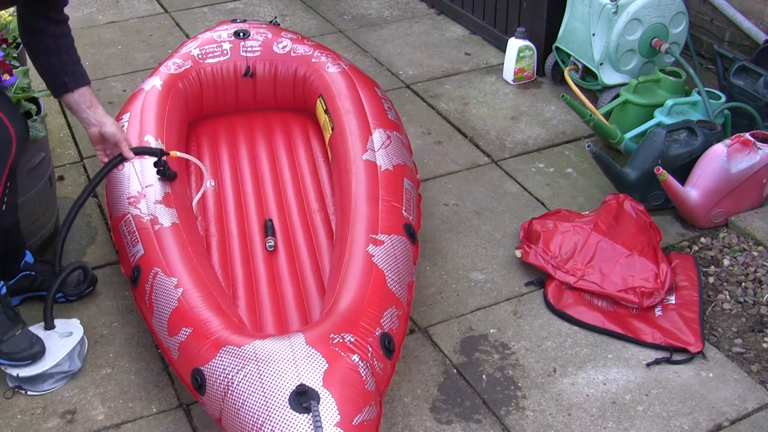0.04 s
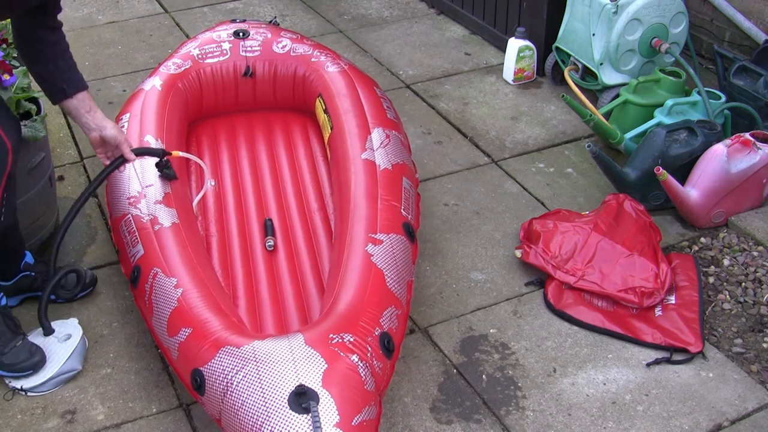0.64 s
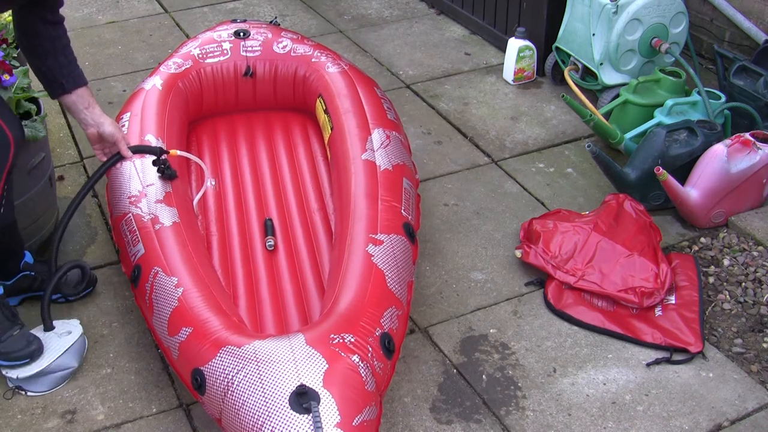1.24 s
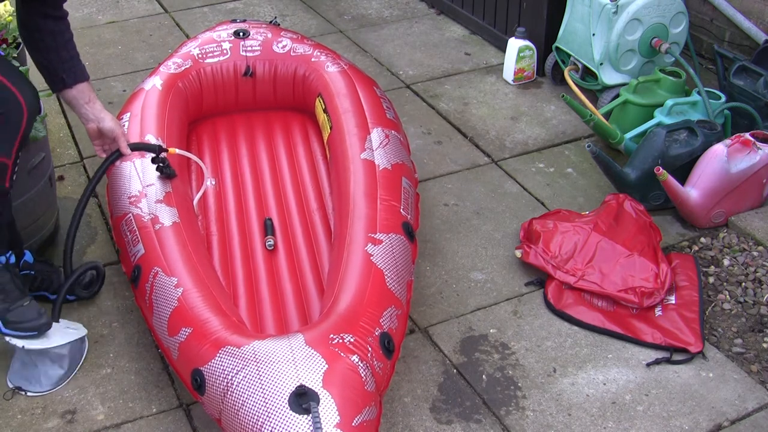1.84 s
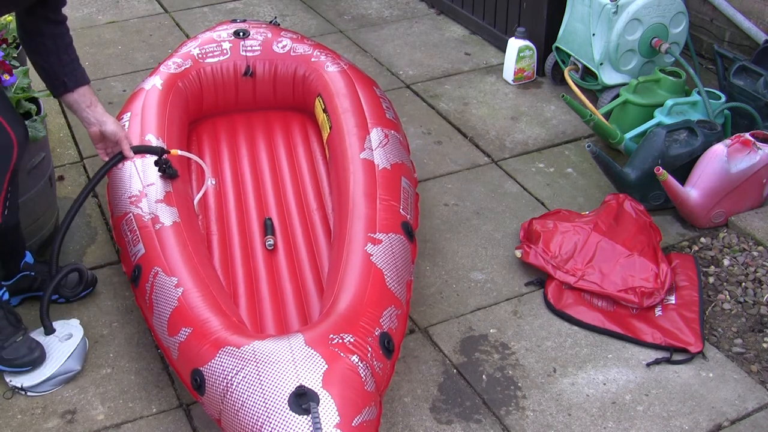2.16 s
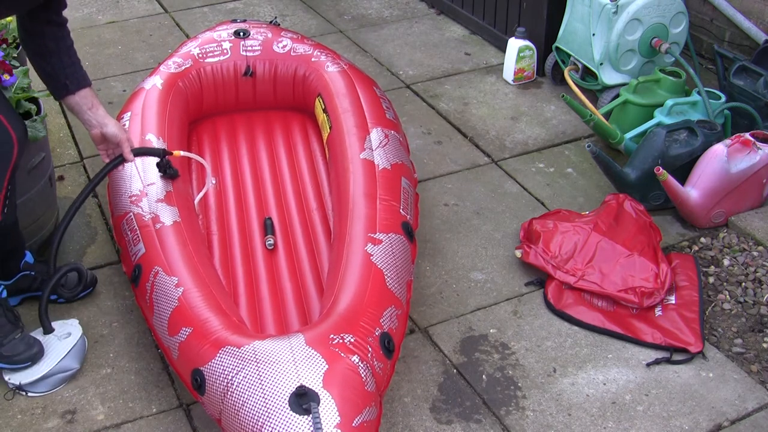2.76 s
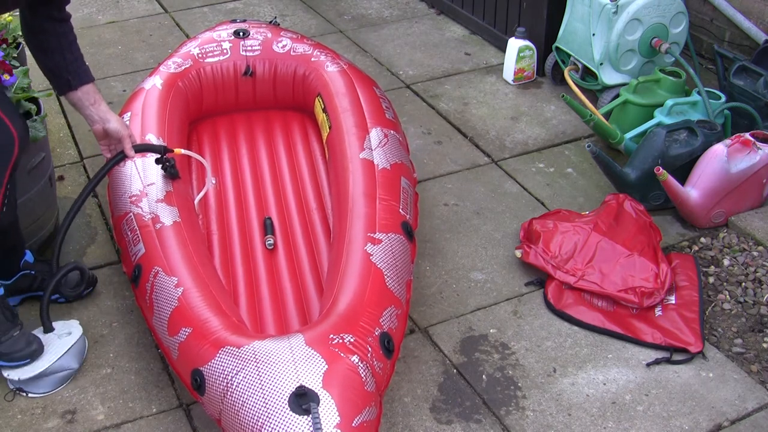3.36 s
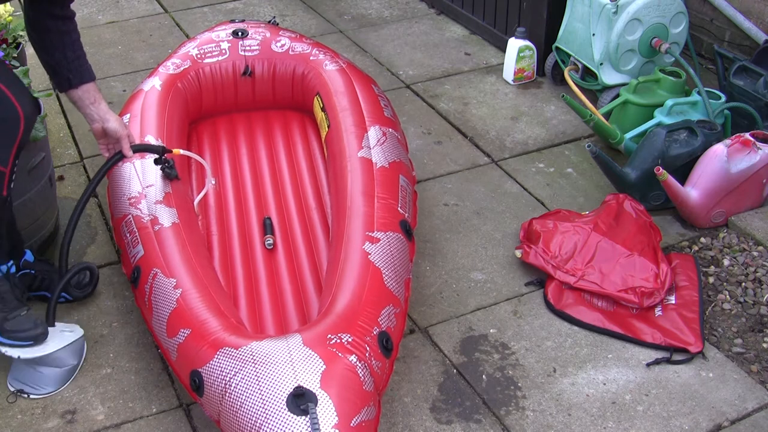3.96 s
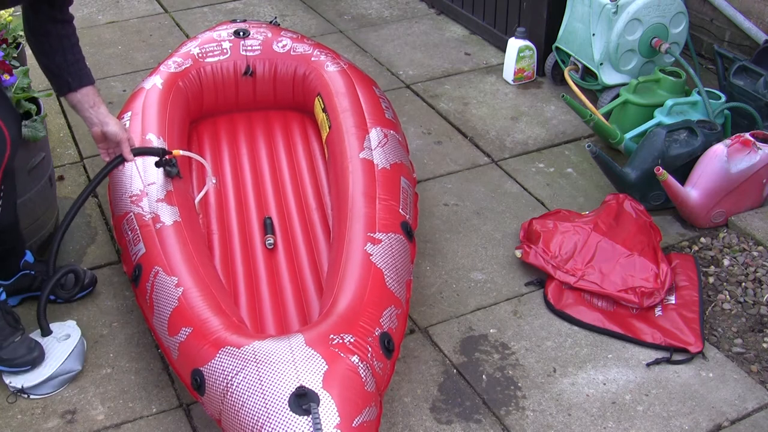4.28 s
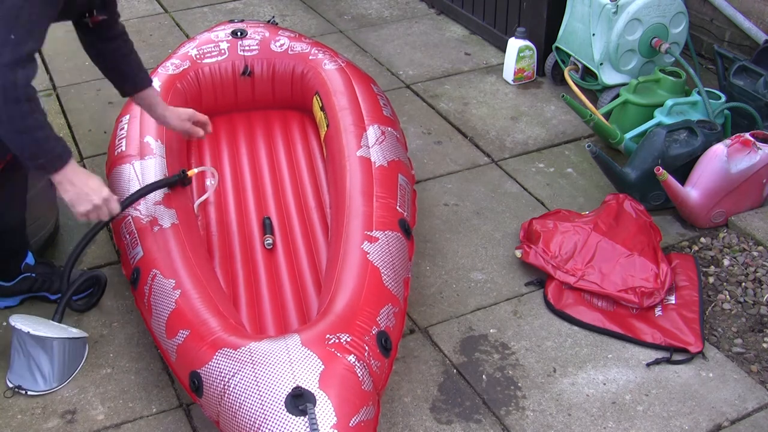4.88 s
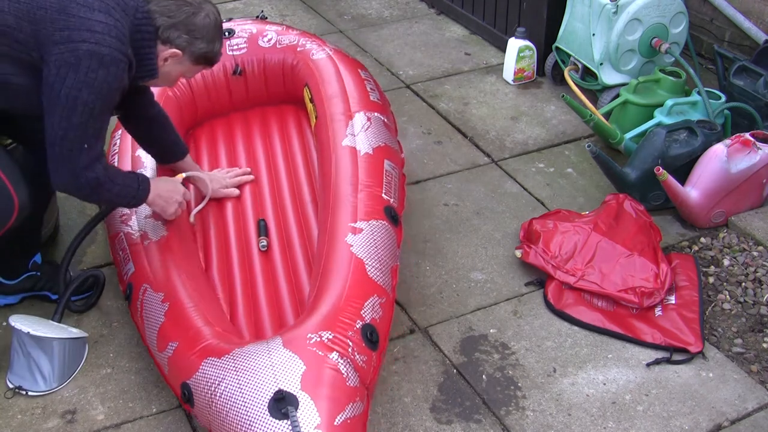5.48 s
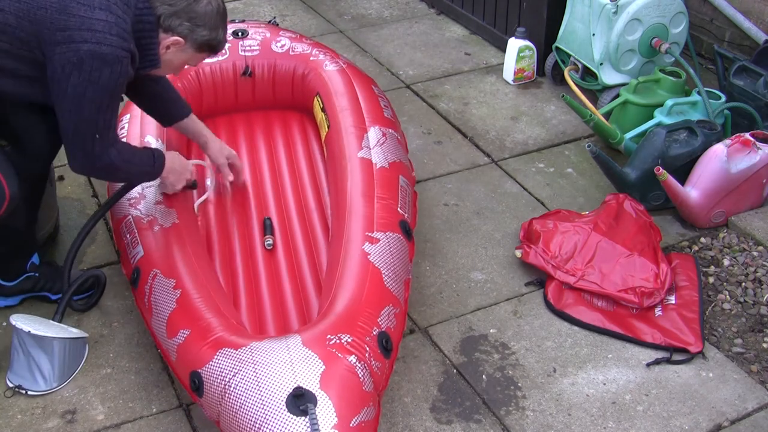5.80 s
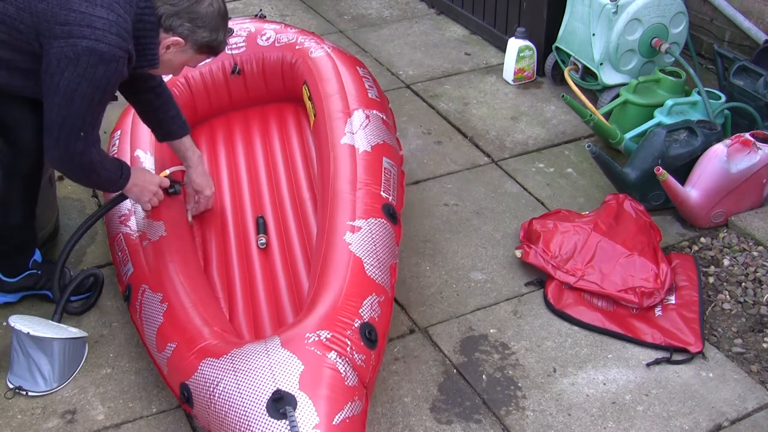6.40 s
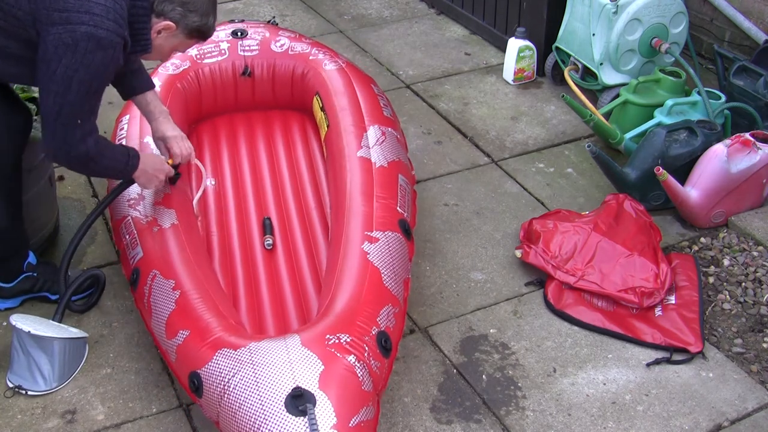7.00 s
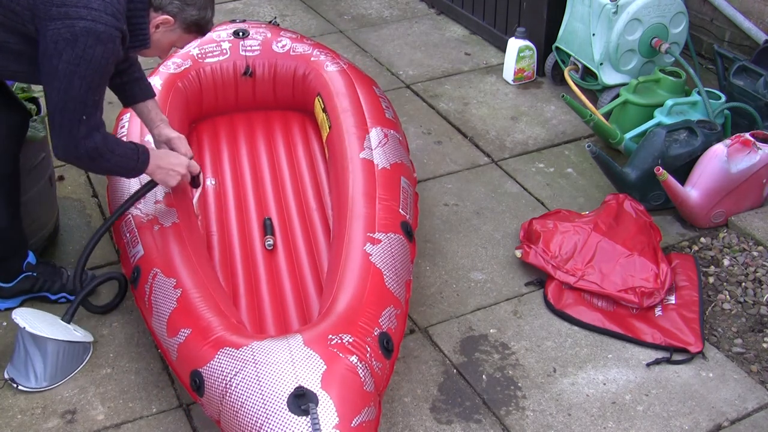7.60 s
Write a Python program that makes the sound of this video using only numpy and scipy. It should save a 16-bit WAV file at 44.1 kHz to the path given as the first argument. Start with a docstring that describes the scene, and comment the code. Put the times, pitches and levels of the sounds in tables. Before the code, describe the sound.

Steady foot pump strokes fill an inflatable boat outdoors as birds chirp, followed by nozzle clicks, a hollow bump and a sudden hiss.

```python
"""A paved patio, where a bellows foot pump fills an inflatable kayak. The fabric crumples as it refills,
the intake flap claps shut, and each tread drives a whoosh of turbulent air down the hose. Then hands
work the clicking plastic nozzle loose and bump the hull, and a jet of air hisses from the valve.
A tit sings its two notes and another bird whistles farther off, over the rumble of a distant town."""
import sys
import numpy as np
from scipy import signal
from scipy.fft import rfft, irfft
from scipy.io import wavfile
from scipy.ndimage import uniform_filter1d

SR = 44100
rng = np.random.default_rng(int(sys.argv[2]) if len(sys.argv) > 2 else 0)


def wav_record(signal):
    """Record a signal, one row per channel, as 16-bit PCM in the file named by sys.argv[1]."""
    frames = np.transpose(np.atleast_2d(signal))
    bounded = np.clip(frames, -1, 1)
    # unit amplitude maps onto the largest positive 16-bit level
    quanta = np.round(bounded * 32767).astype(np.int16)
    wavfile.write(sys.argv[1], SR, quanta)


N = 336924
T = np.arange(N) / SR


def amp(db):
    return 10 ** (np.asarray(db) / 20)


def unit(x):
    return x / np.sqrt(np.mean(x ** 2) + 1e-20)


def read(points, hz):
    """Joins points by straight lines on a log-frequency axis."""
    f, value = np.transpose(points)
    return np.interp(np.log(hz + 1), np.log(f + 1), value)


def add(mix, s, sound):
    """Lays a sound into the mix at time s."""
    start = round(s * SR)
    sound = sound[max(-start, 0):]
    part = mix[max(start, 0):][:len(sound)]
    part += sound[:len(part)]


def drift(hz, size=4096):
    """Random wander of rms 1, moving up to hz times a second."""
    return unit(np.interp(2 * hz * T, np.arange(size), rng.standard_normal(size)))


def swell(s, rise_s, fall_s, roundness=1):
    """Gain that grows to 1 at time s and dies away; roundness 1 is a sharp crest, 2 a bell."""
    gain = np.zeros(N)
    near = slice(*np.searchsorted(T, [s - 10 * rise_s, s + 10 * fall_s]))
    distance = np.maximum((s - T[near]) / rise_s, (T[near] - s) / fall_s)
    gain[near] = np.exp(-abs(distance) ** roundness)
    return gain


def gate(from_s, to_s, in_s, out_s):
    """Gain of 1 between two times, with a ramp around each."""
    return np.clip(np.minimum((T - from_s) / in_s, (to_s - T) / out_s) + .5, 0, 1)


def body(colour, rings=(), size=4096):
    """Minimum-phase response: a broad colour (Hz, dB) with resonances (Hz, width Hz, height dB)."""
    hz = np.fft.rfftfreq(size, 1 / SR)
    peaks = sum((amp(db) - 1) / (1 + (2 * (hz - f) / width) ** 2) for f, width, db in rings)
    gain = amp(read(colour, hz)) * (1 + peaks)
    cepstrum = irfft(np.log(np.maximum(gain, 1e-5)))
    cepstrum[1:size // 2] *= 2
    cepstrum[size // 2 + 1:] = 0
    return irfft(np.exp(rfft(cepstrum)))


def through(x, response):
    return signal.oaconvolve(x, response)[:len(x)]


def shelf(x, hz, treble_db):
    """Raises or lowers everything above hz."""
    low = signal.sosfilt(signal.butter(1, hz, fs=SR, output="sos"), x)
    return low + amp(treble_db) * (x - low)


def grains(per_s, spread_db, smooth):
    """Tiny slips of uneven size over a share of smooth noise."""
    slips = (rng.random(N) < per_s / SR) * rng.choice([-1, 1], N)
    sizes = amp(spread_db * np.minimum(rng.exponential(1, N), 3))
    return unit(unit(slips * sizes) + smooth * rng.standard_normal(N))


def strike(response, rattle, rattle_s, size=8000):
    """One sharp push and its dying chatter, through a body."""
    t = np.arange(size) / SR
    chatter = rng.standard_normal(size) * np.exp(-t / rattle_s)
    return through((t == 0) + rattle * chatter / np.linalg.norm(chatter), response)


def peaked(x, db):
    """Scales a hit so that its loudest 4 ms have this level."""
    return amp(db) * x / np.sqrt(uniform_filter1d(x ** 2, size=176).max())


def blurred(hz, width_hz, size=4096):
    """A band of noise that follows a pitch curve."""
    noise = rng.standard_normal((2, len(hz) + size))
    lowpass = signal.butter(3, width_hz / 2, fs=SR, output="sos")
    real, imag = signal.sosfilt(lowpass, noise)[:, size:]
    carrier = np.exp(2j * np.pi * np.cumsum(hz) / SR)
    return unit(((real + 1j * imag) * carrier).real)


def swishes(rows):
    """Short swells of noise in one band each."""
    out = np.zeros(N)
    for s, length_s, hz, width_hz, db in rows:
        count = int(length_s * SR)
        add(out, s, amp(db) * blurred(np.full(count, hz), width_hz) * signal.windows.tukey(count, .7))
    return out


def off_walls(x, depth, delay_s, count=5):
    """A few reflections comb the spectrum."""
    delays = (SR * delay_s * rng.uniform(.1, 1, count)).astype(int)
    reflections = sum(np.pad(x, (delay, 0))[:N] for delay in delays)
    return (x + depth * reflections) / np.sqrt(1 + count * depth ** 2)


def past_fingers(x, depth, delay_s, count=4):
    """Short reflections come and go as the fingers move, rippling the colour."""
    delays = (SR * delay_s * rng.uniform(.15, 1, count)).astype(int)
    return unit(x + depth * sum(np.roll(x, delay) * drift(7.8) for delay in delays))


def echoes(x, t60s, delay_s, size=32768):
    """Sparse reflections from paving, fence and walls; each band dies at its own rate (Hz, T60 s)."""
    taps = rng.choice([-1., 1.], size) * (rng.random(size) < 2000 / SR)
    taps *= np.arange(size) > delay_s * SR
    hz, t, spectra = signal.stft(taps, SR, nperseg=256)
    decay = amp(-60 * t / read(t60s, hz)[:, None])
    _, tail = signal.istft(spectra * decay, SR, nperseg=256)
    return through(x, tail / np.linalg.norm(tail))


# Town spectrum. Each row: frequency in Hz, gain in dB.
TOWN_COLOUR = [(15, -60), (25, -14.5), (130, 6), (180, -7), (277, -3.5), (476, -11), (754, -14),
               (1260, -19.5), (1790, -27), (2610, -22), (3430, -17.5), (3820, -22.5), (6920, -29),
               (14800, -39.5), (16000, -57)]


def town(rumble_db=-49, waver_db=1.5, drone_db=-54, drone_hz=128):
    """A soft distant rumble with a wavering low drone."""
    rumble = unit(through(rng.standard_normal(N), body(TOWN_COLOUR)))
    rumble *= amp(rumble_db + waver_db * drift(2))
    drone = drift(8.7) * np.sqrt(2) * np.sin(2 * np.pi * drone_hz * T)
    return rumble + amp(drone_db) * drone


# Note contours. Each row: time into the note in seconds, pitch in Hz, relative level in dB.
LOW_NOTE = [(0, 3680, -21), (.012, 3660, 1), (.035, 3610, -1.5), (.056, 3540, -1.5), (.085, 3540, -7),
            (.1, 3500, -18)]
HIGH_NOTE = [(0, 4330, -34), (.01, 4280, -2.5), (.02, 4225, 2.5), (.042, 4230, -8.5), (.064, 4190, 1),
             (.084, 4100, -6.5)]
# Calls on each note. Each row: start in seconds, level in dB.
LOW_CALLS = [(-.025, -39), (0.347, -36), (.803, -37), (2.433, -35.5), (2.831, -40), (3.222, -36),
             (3.633, -37), (5.04, -37), (5.439, -37), (5.852, -34)]
HIGH_CALLS = [(.088, -37), (.498, -35.5), (0.923, -35), (2.149, -37.5), (2.556, -35.5), (2.962, -34),
              (3.367, -32), (3.79, -32), (5.179, -33.5), (5.588, -35), (5.998, -32.5)]


def tit(waver_db=2.5, octave_db=-31, chip_db=-11, chip_s=.02, chip_hz=4600, chip_width_hz=600):
    """Two thin falling notes in turn; the higher one starts with a hoarse chip."""
    out = swishes([(s, chip_s, chip_hz, chip_width_hz, db + chip_db) for s, db in HIGH_CALLS])
    for note, calls in (LOW_NOTE, LOW_CALLS), (HIGH_NOTE, HIGH_CALLS):
        at_s, hz, shape_db = np.transpose(note)
        t = np.arange(0, at_s[-1], 1 / SR)
        for s, db in calls:
            detune = 1 + .0029 * rng.standard_normal()
            phase = 2 * np.pi * np.cumsum(np.interp(t, at_s, hz)) * detune / SR
            tone = np.sin(phase) + amp(octave_db) * np.sin(2 * phase)
            add(out, s, np.sqrt(2) * tone * amp(np.interp(t, at_s, shape_db) + db))
    return out * amp(waver_db * drift(62))


# The foot lifts and the bellows refill. Each row: first crease in seconds, fastest unfolding in
# seconds, crumpling and rasp of drawn air in relative dB.
LIFTS = [(0.032, 0.177, -20, -35), (0.875, 1.004, -21.5, -35), (1.614, 1.741, -21.5, -39.5),
         (2.297, 2.396, -20, -38.5), (2.999, 3.091, -21.5, -37), (3.694, 3.79, -23, -38.5),
         (4.425, 4.521, -22.5, -41)]
# The foot bears down; in the last three rows the freed bellows spring open. Each row: crest in seconds,
# then crumpling, rasp, slack fabric's crumpling and its rasp, all in relative dB.
CRUMPLES = [(0.449, -16, -39, -41, -68), (1.22, -18, -40, -42, -68), (1.959, -20, -37, -39.5, -64),
            (2.617, -19.5, -41, -34, -45), (3.293, -20, -33.5, -37, -57), (4.015, -21.5, -35, -34, -42.5),
            (4.722, -23, -35.5, -62, -75), (4.793, -24.5, -42, -37, -50), (4.896, -23, -43, -36.5, -48)]


def folding(rustle_until_s=5.02, rustle_db=-48.5, rustle_rasp_db=-65, slack_lead_s=.055):
    """Crumple and rasp gains: a soft rustle, a slow swell per lift, a quick one per crumple."""
    worked = gate(0, rustle_until_s, in_s=.08, out_s=.03)
    crumple, rasp = amp(rustle_db) * worked, amp(rustle_rasp_db) * worked
    for start_s, s, crumple_db, rasp_db in LIFTS:
        crumple += amp(crumple_db) * swell(s, rise_s=.053, fall_s=.033) * (T > start_s)
        drawing = gate(s - .26, s + .095, in_s=.05, out_s=.05)
        rasp += amp(rasp_db) * swell(s, rise_s=.083, fall_s=.049, roundness=1.32) * drawing
    for s, crumple_db, rasp_db, slack_db, slack_rasp_db in CRUMPLES:
        quick = swell(s, rise_s=.018, fall_s=.019, roundness=1.13)
        slack = swell(s - slack_lead_s, rise_s=.033, fall_s=.033, roundness=2.9)
        crumple += amp(crumple_db) * quick + amp(slack_db) * slack
        rasp += amp(rasp_db) * quick + amp(slack_rasp_db) * slack
    return crumple, rasp


# Spectra of the bellows cavity and the rasp. Each row: frequency in Hz, gain in dB.
CAVITY_COLOUR = [(50, -30.5), (100, -16), (170, -3), (270, 0), (400, -2), (540, 2), (730, -12),
                 (1000, -8.5), (1500, -16.5), (2000, -17.5), (3500, -21), (6000, -29), (15000, -57.5)]
RASP_COLOUR = [(600, -26.5), (1500, 8), (2500, -0.5), (4000, 4.5), (5500, -2.5), (8000, -9), (11000, -16.5),
               (15500, -26.5)]
# Folds buckling. Each row: start in seconds, level in dB, treble shelf in dB.
BUCKLES = [(.146, -18, -3), (.187, -24, 0), (.421, -21.5, -2), (.448, -18.5, -14), (.455, -22, -15),
           (.964, -17.5, 9), (1.003, -11, -9), (1.166, -25, 6), (1.211, -19, 0), (1.703, -15, 11),
           (1.726, -18.5, 7), (1.735, -13, 3.5), (1.95, -17.5, 8), (2.353, -20.5, 1), (2.398, -20, 9),
           (2.611, -21, 4), (3.067, -14.5, 0.5), (3.094, -18, -12), (3.3, -15, 13), (3.769, -21, 12),
           (3.81, -18.5, -9), (4.005, -16.5, 4), (4.014, -18.5, 9), (4.028, -20.5, 2), (4.501, -14, -5),
           (4.54, -18.5, 5), (4.776, -17, -1), (4.802, -22, -12)]


def bellows(crumple_gain_db=-4, rasp_gain_db=.5, clump_db=3, crease_db=-28.5, crease_treble_db=-14):
    """Coated fabric creases in many small slips and a few big buckles, sounding the air inside."""
    cavity = body(CAVITY_COLOUR, rings=[(416, 22, 3.9), (590, 45, 2.5), (1530, 144, 7.2)])
    crumpling, rasping = folding()
    slips = unit(through(grains(per_s=400, spread_db=3.5, smooth=.51), cavity))
    rasp = unit(through(grains(per_s=900, spread_db=23, smooth=1.2), body(RASP_COLOUR)))
    out = slips * crumpling * amp(crumple_gain_db)
    out += rasp * rasping * amp(rasp_gain_db + clump_db * drift(55))
    first_creases = [(start_s, crease_db, crease_treble_db) for start_s, *_ in LIFTS[1:]]
    for s, db, treble_db in BUCKLES + first_creases:
        buckle = strike(cavity, rattle=1, rattle_s=.0052)
        add(out, s, peaked(shelf(buckle, 2400, treble_db), db))
    return out


# Flap and plate claps. Each row: start in seconds, level in dB, hollow body gain in dB.
CLAPS = [(.269, -15.5, -4.5), (.3, -26.5, 6), (1.092, -23, -2), (1.836, -17.5, -1.5), (2.494, -19.5, -3),
         (3.205, -22.5, 2), (3.719, -27, -8), (3.911, -17, -0.5), (4.852, -12.5, 2), (4.877, -15.5, -5),
         (5.391, -27, 4)]
# Clap spectrum. Each row: frequency in Hz, gain in dB.
FLAP_COLOUR = [(100, -35), (250, -1.5), (380, 7), (520, 3.5), (740, -13), (1080, 2), (1350, 1), (1650, -7),
               (2000, -9.5), (2500, -8), (4000, -27.5), (8000, -39), (15000, -67)]


def flap():
    """Intake flap and tread plate shut with a hollow plastic clap as the foot works the pump."""
    out = np.zeros(N)
    for s, db, body_db in CLAPS:
        tilt = [(700, body_db), (1050, 0)]
        colour = [(hz, gain_db + read(tilt, hz)) for hz, gain_db in FLAP_COLOUR]
        plastic = body(colour, rings=[(1030, 72, .88), (1650, 58, 9.8)])
        add(out, s, peaked(strike(plastic, rattle=1, rattle_s=.0044), db))
    return out


# Nozzle and valve clicks. Each row: start in seconds, level in dB, lower body and top gains in dB.
CLICKS = [(.357, -36, 15, -13), (1.003, -22.5, 7, -22), (3.045, -33, 5, -12), (4.912, -36, -8, -16),
          (4.977, -36.5, 6, -18), (1.172, -33, 3, -15), (1.211, -31, -10, -10), (1.679, -34, 4, -17),
          (1.9863, -13.5, -4.5, -18), (2.597, -30.5, 7, -17), (2.669, -27.5, 1, -5),
          (4.346, -39.5, -1, -15), (4.447, -35, -1, -10), (4.6827, -23, -14, -9), (4.7142, -22, -2, -4),
          (4.757, -30, 3, -13), (4.822, -29.5, -14, -20), (4.8574, -30, -1, -1), (5.221, -32, 3, -18),
          (5.29, -35, 1, -14), (5.309, -30, -4, -18), (5.345, -31.5, -14, -18), (5.5368, -23, 6.5, -12),
          (5.9143, -24, -4.5, -16), (5.984, -35, 1, -18), (6.0693, -33, 4, -2), (6.774, -26.5, 7, -11),
          (6.787, -33, -6, -9), (6.817, -28, -14, -18), (6.832, -31, -2.5, -16), (6.9346, -33.5, 1.5, 0),
          (7.0043, -28.5, -8, -5), (7.026, -35, 1, -1), (7.085, -34, -4, -20)]
# Fingers at work on the nozzle. Each row: start and end in seconds.
HANDLING = [(4.68, 5.0), (5.25, 6.25), (6.72, 7.15)]
# Nozzle spectrum. Each row: frequency in Hz, gain in dB.
NOZZLE_COLOUR = [(200, -6.5), (500, 2), (1200, -7.5), (2200, -5.5), (3100, -3), (4500, -4.5), (7500, -3),
                 (9500, -12), (12000, -8), (16000, -11)]
# Nozzle modes. Each row: frequency in Hz, width in Hz, height in dB.
NOZZLE_RINGS = [(2920, 500, 7), (3450, 130, 7), (5730, 70, 7.5), (6950, 210, 12), (8330, 300, 6.5),
                (8950, 320, 3), (12040, 340, 12.5)]


def nozzle(ticks_per_s=18, tick_db=-45, tick_spread_db=3):
    """Hard plastic parts catch on each other; the shifting grip favours different modes each time."""
    out = np.zeros(N)
    ticks = [(rng.uniform(start_s, end_s), tick_db + tick_spread_db * rng.standard_normal(), 0, -15)
             for start_s, end_s in HANDLING for _ in range(round(ticks_per_s * (end_s - start_s)))]
    for s, db, low_db, top_db in CLICKS + ticks:
        tilt = [(3100, low_db), (4500, 0), (9500, 0), (12000, top_db)]
        colour = [(hz, gain_db + read(tilt, hz)) for hz, gain_db in NOZZLE_COLOUR]
        rings = [(hz * rng.uniform(.985, 1.015), width_hz, height_db + rng.uniform(-4, 4))
                 for hz, width_hz, height_db in NOZZLE_RINGS]
        add(out, s, peaked(strike(body(colour, rings), rattle=3.3, rattle_s=.0042), db))
    return out


# Treads on the pump. Each row: valve opening, strongest flow and valve shutting in seconds,
# then flow and treble in relative dB.
TREADS = [(.485, 0.634, .83, -28.5, -4), (1.253, 1.358, 1.535, -28.5, -5.5),
          (2.001, 2.077, 2.284, -30.5, -4.5), (2.661, 2.753, 2.93, -31.5, -4),
          (3.347, 3.452, 3.625, -33, -4.5), (4.07, 4.154, 4.355, -32.5, -3.5)]
# Hose spectrum. Each row: frequency in Hz, gain in dB.
HOSE_COLOUR = [(88, -57), (150, -31), (175, -12), (361, -10), (702, -18.5), (888, -8), (1190, -7.5),
               (1290, -3.5), (1630, -7.5), (3550, -5), (4410, -6), (5460, -7), (7620, -12.5),
               (13700, -18.5), (16000, -28)]
# Hose modes. Each row: frequency in Hz, width in Hz, heights in dB before and after the hose shifts.
HOSE_RINGS = [(1295, 23, 10.5, 8.5), (2490, 120, 7.5, 6.5), (3100, 48, 8, 4.5), (3510, 180, 7, 5.5),
              (3855, 58, -1, 5), (3960, 99, 6.5, -3), (5410, 76, 5, 10.5), (5860, 29, 5, 2),
              (6430, 85, 5, -16), (8600, 250, 5.5, 4)]


def hose(shift_s=1.8, air_gain_db=5, treble_gain_db=5, flutter_db=.64, lip_gain_db=-11):
    """Turbulent air rings the hose; the hiss at the valve lip rises in pitch with the flow."""
    turbulence = off_walls(rng.standard_normal(N), depth=.13, delay_s=.014)  # standing waves
    before = body(HOSE_COLOUR, [(hz, width_hz, db) for hz, width_hz, db, _ in HOSE_RINGS])
    after = body(HOSE_COLOUR, [(hz, width_hz, db) for hz, width_hz, _, db in HOSE_RINGS])
    air = np.where(T < shift_s, unit(through(turbulence, before)), unit(through(turbulence, after)))
    _, crests_s, _, _, treble_db = np.transpose(TREADS)
    air = shelf(air, 6500, np.interp(T, crests_s, treble_db) + treble_gain_db)
    flow = np.zeros(N)
    for opens_s, crest_s, shuts_s, db, _ in TREADS:
        push = swell(crest_s, rise_s=.091, fall_s=.12, roundness=1.65)
        flow += amp(db) * push * gate(opens_s, shuts_s, in_s=.016, out_s=.05)
    flow_db = np.maximum(20 * np.log10(flow / flow.max() + 1e-9), -25)
    lip = blurred(hz=14300 + 230 * flow_db, width_hz=1500)
    air *= amp(air_gain_db + flutter_db * drift(60))
    return (air + amp(lip_gain_db) * lip) * flow


# Slurred whistles. Each row: start and length in seconds, first, middle and last pitch in Hz,
# blur in Hz, level in dB.
WHISTLES = [(2.91, 0.11, 7530, 8180, 8400, 89, -51), (3.12, 0.13, 8500, 8700, 8400, 80, -60),
            (4.357, 0.071, 4300, 4880, 5740, 400, -53), (4.564, 0.088, 4900, 5240, 5560, 400, -58),
            (4.946, 0.07, 4460, 4860, 5100, 400, -52), (5.13, 0.043, 5600, 5830, 5960, 250, -54),
            (6.186, 0.21, 4330, 3540, 3000, 500, -52.5), (6.423, 0.18, 3130, 3196, 3380, 455, -55.5),
            (6.514, 0.21, 3980, 4080, 4200, 350, -59.5), (6.597, 0.11, 1850, 1937, 2560, 150, -55.5),
            (6.707, .11, 7100, 7670, 7800, 150, -50.5), (6.825, 0.18, 8330, 8600, 8300, 131, -57),
            (6.716, 0.28, 2740, 3290, 3350, 450, -59.5), (6.925, 0.26, 4500, 3940, 3130, 500, -63),
            (7.128, 0.12, 6700, 6800, 6950, 302, -58)]


def far_bird(pitch_waver=.25, waver_db=2):
    """Thin wavering slurs, blurred on their way across the gardens."""
    out = np.zeros(N)
    for s, length_s, first_hz, middle_hz, last_hz, blur_hz, db in WHISTLES:
        count = int(length_s * SR)
        hz = np.interp(np.linspace(0, 1, count), [0, .5, 1], [first_hz, middle_hz, last_hz])
        hz += pitch_waver * blur_hz * drift(20)[:count]
        add(out, s, amp(db) * blurred(hz, blur_hz) * signal.windows.tukey(count, .5))
    return out * amp(waver_db * drift(25))


# Hands bumping the hull. Each row: start in seconds, relative level in dB, slap shelf in dB.
BUMPS = [(5.034, -29, -12), (5.065, -30.5, -16), (5.219, -16, 0), (5.229, -22, -1), (5.261, -26, -4),
         (5.304, -26, -3), (5.914, -31.5, 0), (6.789, -34, -2), (7.0, -31, -5), (7.226, -25, -5),
         (7.31, -24.5, 4)]
# Hands and sleeves sliding on vinyl. Each row: crest, rise and fall in seconds, level in dB.
SLIDES = [(5.31, .04, .05, -45.5), (5.455, 0.053, .06, -41), (5.66, 0.04, 0.041, -50),
          (5.849, .11, 0.013, -36.5), (5.99, 0.024, 0.017, -42), (6.163, 0.019, 0.053, -44.5)]
# Spectra of the taut hull and rubbed vinyl. Each row: frequency in Hz, gain in dB.
HULL_COLOUR = [(30, -39), (60, -1.5), (115, 0), (210, 1), (330, 1.5), (520, -4.5), (750, -16), (1150, -12),
               (2000, -27.5), (5000, -29), (15000, -44)]
VINYL_COLOUR = [(290, -28), (500, 2), (668, -9), (933, -6), (2770, -11), (3150, -10), (4730, -9),
                (8330, -14.5), (16000, -36)]


def hands(bump_gain_db=-1, catch_db=3, lean_s=(5.225, 6.33), settle_db=-30, murmur_db=-47):
    """Palms bump and slide on the inflated hull; it booms, settles and murmurs under a leaning hand."""
    hull = body(HULL_COLOUR, rings=[(121, 15, 5.4), (213.4, 10.3, 6.8), (332, 49, 1.2)])
    friction = unit(through(grains(per_s=1500, spread_db=3.5, smooth=1.2), body(VINYL_COLOUR)))
    sliding = sum(amp(db) * swell(s, rise_s, fall_s) for s, rise_s, fall_s, db in SLIDES)
    out = friction * sliding * amp(catch_db * drift(50))
    settling = amp(settle_db) * swell(lean_s[0], rise_s=.11, fall_s=.11)
    leaning = gate(*lean_s, in_s=.016, out_s=.092) * (amp(murmur_db) + settling)
    out += unit(through(grains(per_s=230, spread_db=8.5, smooth=1), hull)) * leaning
    for s, db, slap_db in BUMPS:
        boom = strike(hull, rattle=2.23, rattle_s=.012)
        add(out, s, peaked(shelf(boom, 460, slap_db), db + bump_gain_db))
    return out


# Finger scrapes. Each row: start and length in seconds, centre and width in Hz, level in dB.
SCRAPES = [(6.145, 0.044, 1737, 1186, -41.5), (6.555, 0.044, 9100, 8600, -61),
           (6.63, 0.095, 9900, 8200, -61.5), (6.755, .11, 1806, 4000, -50), (6.96, 0.15, 2500, 5050, -53)]


def finger_scrapes():
    """Fingers rub the nozzle in short bands of friction noise."""
    return swishes(SCRAPES)


# Jet spectrum. Each row: frequency in Hz, gain in dB.
JET_COLOUR = [(410, -56), (700, -30), (922, -12.5), (1210, -13.5), (1820, -14), (2660, -10), (2960, -4),
              (3690, -5), (6830, -1), (8310, -4.5), (14400, -5), (16000, -8)]
# Jet resonances. Each row: frequency in Hz, width in Hz, height in dB.
JET_RINGS = [(3000, 260, 1.5), (4480, 160, 4), (5700, 240, 4.5), (6840, 280, 3), (10500, 820, 2)]
# The jet catches the hollow of the hull. Each row: crest, rise and fall in seconds, level in dB.
FLUTTERS = [(7.24, .015, 0.025, -26.5), (7.35, .06, .06, -32.5), (7.54, 0.021, 0.027, -38)]
# Short shrill bands of the jet: the first two as a finger crosses it, the last a broad burst as the valve
# opens. Each row: start and length in seconds, centre and width in Hz, level in dB.
SHRILLS = [(7.553, .03, 2940, 620, -23), (7.603, 0.029, 6200, 1300, -22), (7.226, .024, 5100, 5900, -16)]


def valve(opens_s=7.225, jet_db=-20, burst_db=4.2, burst_s=.093, sputter_db=.3, hollow_db=-45):
    """The nozzle comes free: a bright jet bursts past the fingers and sounds the hollow of the hull."""
    jet = through(rng.standard_normal(N), body(JET_COLOUR, JET_RINGS))
    jet = past_fingers(jet, depth=.25, delay_s=.003)
    jet *= amp(jet_db + burst_db * swell(opens_s, burst_s, burst_s) + sputter_db * drift(92))
    colour = [(40, -20), (100, 0), (300, 3), (540, 5), (750, -16), (1100, -10), (2000, -23), (6000, -47)]
    cavity = body(colour, rings=[(102, 22, 6.8), (134, 20, 6.8)])
    flutter = sum(amp(db) * swell(s, rise_s, fall_s, roundness=2.1) for s, rise_s, fall_s, db in FLUTTERS)
    hollow = unit(through(rng.standard_normal(N), cavity)) * (amp(hollow_db) + flutter)
    opening = np.clip((T - opens_s) / .005, 0, 1)
    return (jet + hollow + swishes(SHRILLS)) * opening


# Patio reverberation. Each row: frequency in Hz, T60 in seconds.
PATIO_T60 = [(100, 0.44), (500, 0.24), (2000, 0.21), (6000, 0.15), (15000, 0.31)]


def scene():
    """Pump and boat close by on the patio; the birds heard across the gardens."""
    near = hose() + bellows() + flap() + nozzle() + hands() + finger_scrapes() + valve()
    song = tit()
    whistles = off_walls(far_bird(), depth=.14, delay_s=.036)
    gardens = echoes(amp(-12) * song + amp(-3) * whistles, t60s=[(2000, .45), (8000, .38)], delay_s=.02)
    patio = amp(-13.5) * echoes(near, PATIO_T60, delay_s=.005)
    return (near + patio + song + whistles + gardens + town())[None]


def record(dry, cutoff_hz=15850):
    """A steep low-pass limits the band."""
    lowpass = signal.firwin(511, cutoff_hz, window=("kaiser", 8), fs=SR)
    return signal.oaconvolve(dry, lowpass[None], "same")


dry = scene()
out = record(dry)
wav_record(out)
```